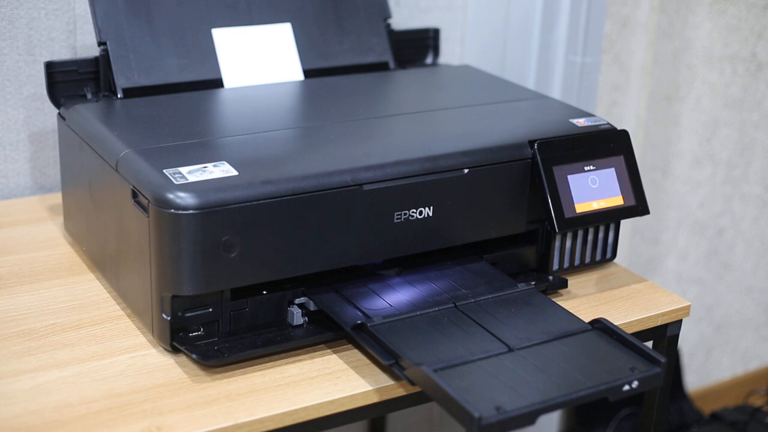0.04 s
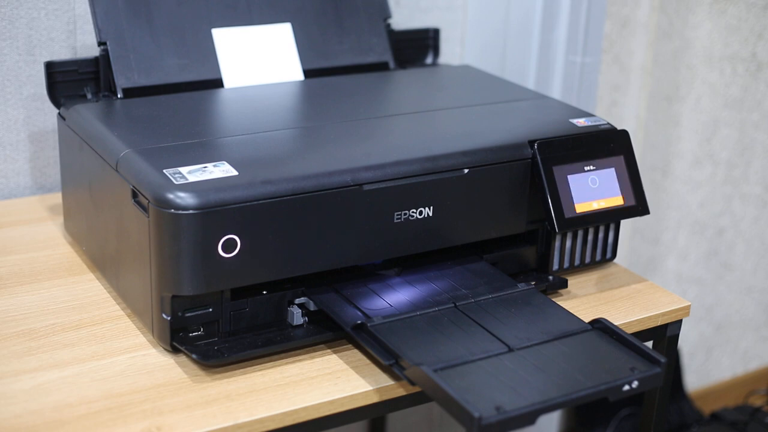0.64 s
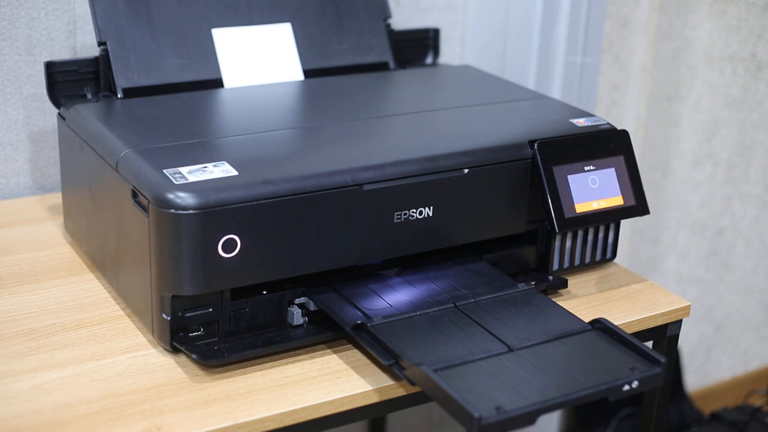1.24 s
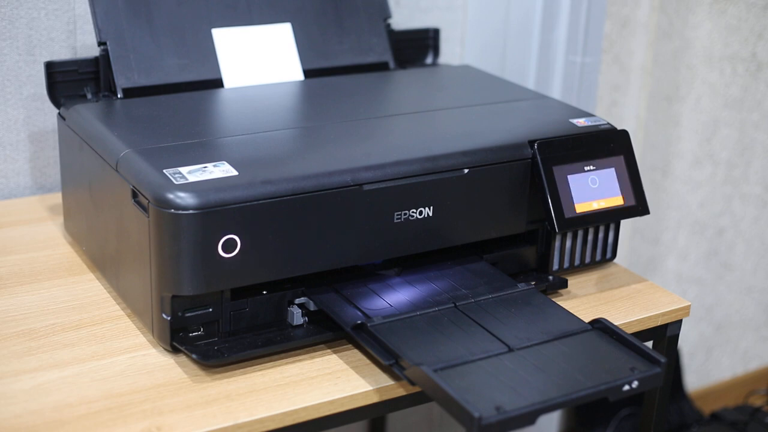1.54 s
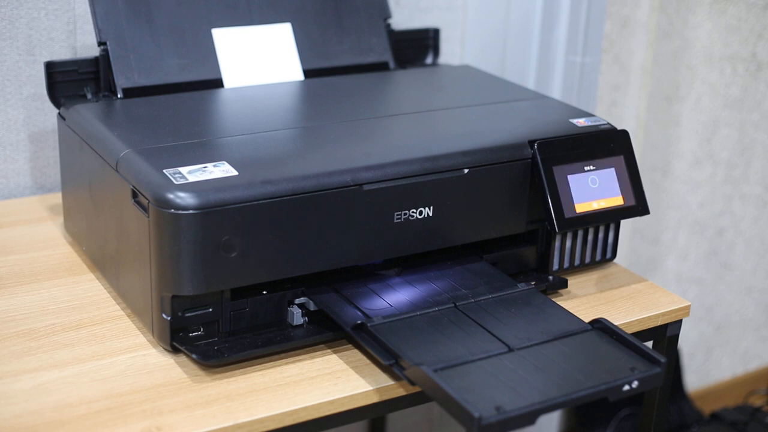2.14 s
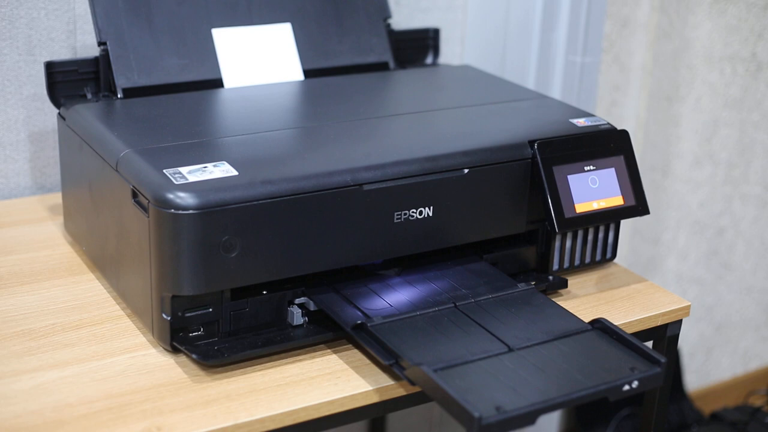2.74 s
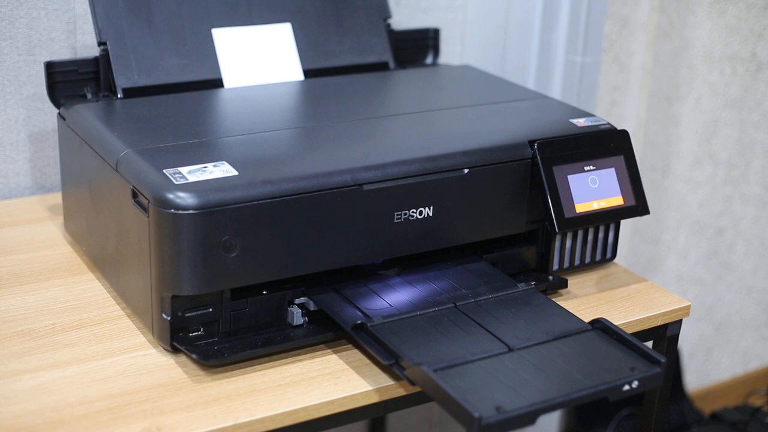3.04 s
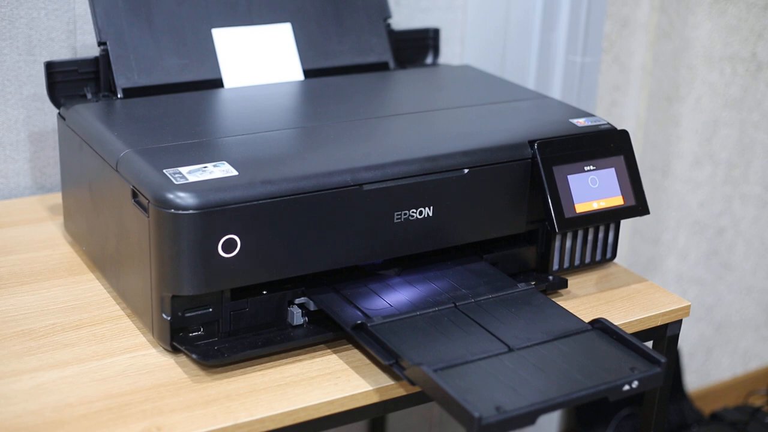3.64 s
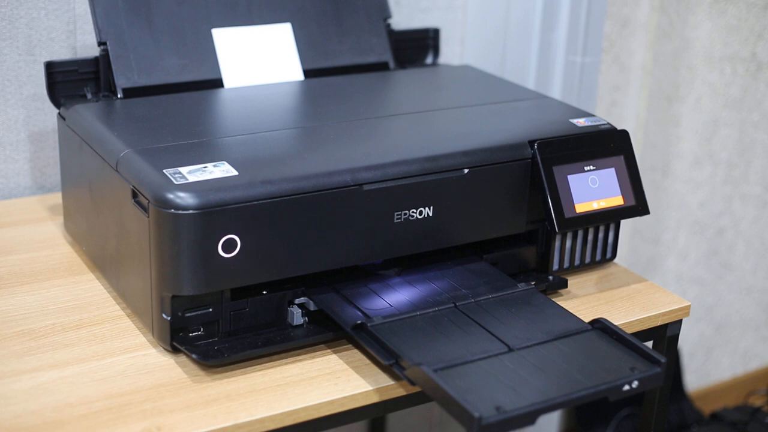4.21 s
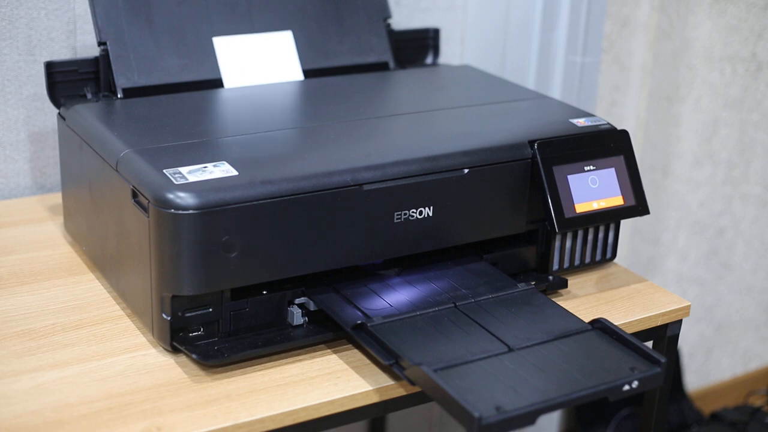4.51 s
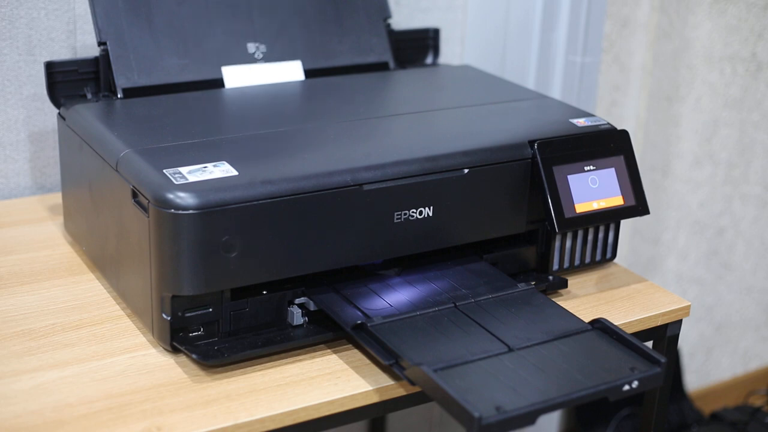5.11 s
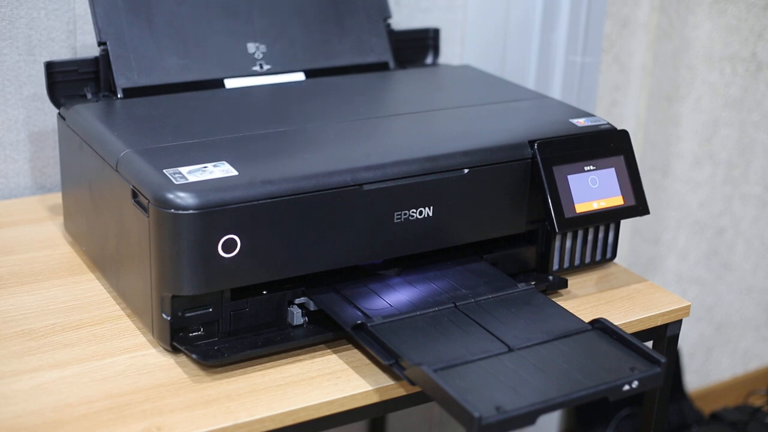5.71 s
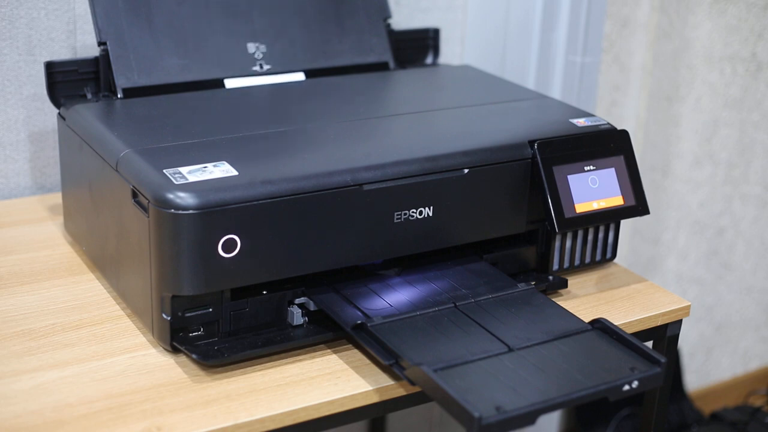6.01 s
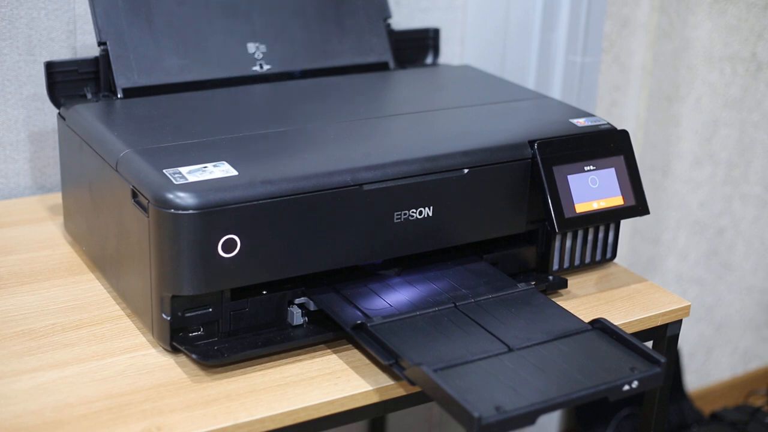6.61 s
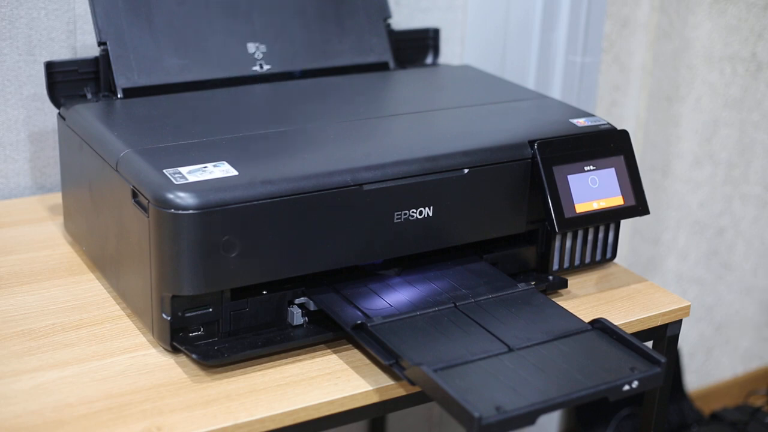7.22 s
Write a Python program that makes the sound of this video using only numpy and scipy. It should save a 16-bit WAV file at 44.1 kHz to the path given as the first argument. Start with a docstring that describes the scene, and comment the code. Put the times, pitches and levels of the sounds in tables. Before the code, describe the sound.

Plastic clicks and carriage knocks from an inkjet printer lead into whirring rollers feeding a sheet, ending with a loud clack.

```python
"""An inkjet printer on a wooden desk in a small room takes in a sheet of paper.
First, plastic levers click and the carriage (the sliding print head) knocks against its stops.
From 3.8 s, geared rollers draw the sheet in with a rattling whir, and a rubber roller chirps on it.
Near 6.8 s a cam (a turning plastic lobe) scrapes to its stop, the feed slams home with a heavy clack,
and the motor runs on briefly. Thin coil whines come and go; a throbbing hum lies under it all."""
import sys
import numpy as np
from scipy import signal
from scipy.fft import rfft, irfft, next_fast_len
from scipy.io import wavfile

SR = 44100
rng = np.random.default_rng(int(sys.argv[2]) if len(sys.argv) > 2 else 0)


def file_out(sig):
    """Save sig as 16-bit WAV at sys.argv[1]."""
    # one column per channel
    cols = np.atleast_2d(sig).T
    # limit, then scale
    lim = np.clip(cols, -1, 1)
    pcm = np.round(lim * 32767).astype(np.int16)
    wavfile.write(sys.argv[1], SR, pcm)


N = 324576
TIME = np.arange(N) / SR
AGE = np.arange(SR // 2) / SR  # seconds since a blow

# tone colour of a struck plastic lever: f/Hz, level/dB
LEVER_SPECTRUM = [(180, -49), (300, -8), (801, -5), (1510, -9.5), (1780, -6), (2360, -0.5), (4230, -2.5),
                  (4830, -4), (5160, -5), (5700, -1), (7570, -5), (9390, -2), (10400, -46), (12700, -17),
                  (16000, -37)]
# pitches at which the plastic panels ring: f/Hz, width/Hz, level/dB
PANEL_RESONANCES = [(615, 16, -6.5), (768.5, 49, 4), (941, 13, 0.5), (1229, 54, 4), (1527, 38, 3),
                    (2274, 84, -1), (2900, 6.7, -2), (3405, 18, 1), (4370, 24, 0), (4500, 47, -22),
                    (6250, 280, -28), (6500, 99, 2.5), (7300, 62, -4.5)]
# the carriage shifts, trips a lever and brakes: t/s, click/dB, brightness/dB, shudder/dB, knock/dB
CARRIAGE_SHIFTS = [(0.1093, -29, -1, -40.5, -37), (0.4827, -32, -0.5, -42.5, -44.5),
                   (0.8706, -26.5, 1.5, -42, -52), (2.2283, -31.5, 1, -40, -40),
                   (2.596, -31, -0.5, -43, -46), (3.0107, -28, 2, -43.5, -55)]
BRAKE_DELAY_S = 0.065  # from the click of a shift to its braking knock


def from_db(db):
    """Turns decibels into a gain, the number a sound is multiplied by."""
    return 10 ** (np.asarray(db) / 20)


def rms_one(x):
    """Scales a sound to an average strength (rms) of 1."""
    return x / np.sqrt(np.mean(x ** 2) + 1e-20)


def unit_blow(x):
    """Scales a blow to rms 1 over its first 10 ms."""
    return x / np.sqrt(np.mean(x[:SR // 100] ** 2) + 1e-20)


def coloured(x, spectrum):
    """Gives a sound a tone colour (f/Hz, level/dB) that falls steeply outside its ends; rms 1."""
    size = next_fast_len(len(x))
    hz = np.fft.rfftfreq(size, 1 / SR) + 1e-3
    points_hz, points_db = np.transpose(spectrum)
    db = np.interp(np.log(hz), np.log(points_hz), points_db)
    edges = 1 / np.sqrt(1 + (points_hz[0] / hz) ** 12 + (hz / points_hz[-1]) ** 12)
    return rms_one(irfft(rfft(x, size) * from_db(db) * edges, size)[:len(x)])


def drift(rate_hz):
    """A slow random wobble with a typical size of 1."""
    step, warm_up = 40, 2000
    r = np.exp(-2 * np.pi * rate_hz * step / SR)
    noise = rng.standard_normal(N // step + warm_up + 2)
    slow = signal.lfilter([1], [1, -2 * r, r * r], noise)[warm_up:]
    return np.interp(np.arange(N) / step, np.arange(len(slow)), rms_one(slow))


def grains(per_s, spread_db):
    """Tiny contacts at random times; a spread other than 0 makes their strength uneven."""
    sizes = from_db(spread_db * np.minimum(rng.exponential(1, N), 4)) * rng.choice([-1, 1], N)
    return sizes * (rng.random(N) < per_s / SR)


def resonate(x, resonances):
    """Lets a sound shake a part that rings at certain pitches."""
    out = 0
    for k, (hz, width, db) in enumerate(resonances):
        r = np.exp(-np.pi * width / SR)
        feedback = [1, -2 * r * np.cos(2 * np.pi * hz / SR), r * r]
        ring = (1 - r * r) / 2 * signal.lfilter([1, 0, -1], feedback, x + 1e-18)
        out = out + (-1) ** k * from_db(db) * ring
    return out


def dense_ring(spectrum, t60, tail_db, rise_s, band_hz=(130, 16000), crack_db=-29):
    """Struck plastic: a crack, a noisy ring that falls 60 dB in t60 seconds, and a tail in the room."""
    crack_t60, room_t60 = 0.0067, 0.21
    band = signal.butter(2, band_hz, "band", fs=SR, output="sos")
    noise = coloured(rng.standard_normal(len(AGE)), spectrum)
    crack = from_db(crack_db - 60 * AGE / crack_t60)
    tail = from_db(tail_db - 60 * AGE / room_t60)
    decay = crack + from_db(-60 * AGE / t60) + tail
    return unit_blow(signal.sosfilt(band, noise * decay * (1 - np.exp(-AGE / rise_s))))


def mode_ring(modes):
    """The fading pure tones (modes) of a struck part; every blow mixes them a little differently."""
    ring = 0
    for k, (hz, db, t60) in enumerate(modes):
        decay = from_db(db + rng.standard_normal() - 60 * AGE / t60)
        ring = ring + (-1) ** k * decay * np.sin(2 * np.pi * hz * AGE)
    bass_cut = signal.butter(6, 122, "high", fs=SR, output="sos")  # a small machine has no deep bass
    return unit_blow(signal.sosfilt(bass_cut, ring * (1 - np.exp(-AGE / 0.0011))))


def add(out, s, sound):
    """Mixes a sound in from time s."""
    at = max(0, round(s * SR))
    out[at:at + len(sound)] += sound[:max(0, N - at)]


def gate(start, end, ramp_s):
    """On between two times, with sloping edges."""
    return np.clip(np.minimum(TIME - start, end - TIME) / ramp_s, 0, 1)


def swell(start, end, attack_s, t60):
    """Rises from the start, holds until the end, then dies away."""
    return np.clip((TIME - start) / attack_s, 0, 1) * from_db(-60 * np.clip((TIME - end) / t60, 0, 3))


def together(gains):
    """Gain of unrelated movements that sound at once: their powers add up."""
    return np.sqrt(sum(gain ** 2 for gain in gains))


def paper_feed():
    """Gear teeth rattle the panels and shake the chassis; paper and guides slide with a grainy hiss."""
    # pitches at which the chassis rings on the desk: f/Hz, width/Hz, level/dB
    chassis_resonances = [(141.4, 21.2, 0.5), (152.4, 23.5, -0.5), (193, 13, -10.5), (216.6, 8.2, -11.5),
                          (280.8, 6.8, -3.5)]
    # tone colour of the gear teeth: f/Hz, level/dB
    gear_spectrum = [(250, 0), (420, -6.5), (484, -3), (584, -8.5), (828, -2.5), (910, -9.5), (1130, -7),
                     (1370, -13.5), (1660, -19), (1810, -29), (2130, -23), (2290, -33.5), (2620, -17),
                     (3780, -61), (4000, -57), (5200, -73), (8800, -120)]
    # tone colour of sliding paper and guides: f/Hz, level/dB
    sliding_spectrum = [(1060, -0.5), (1800, 1.5), (2840, -2.5), (3990, -4), (4790, -5.5), (5700, -8),
                        (7560, -10), (10300, -18.5), (14100, -24), (16000, -19)]
    shaking = coloured(rng.standard_normal(N), [(120, 0), (310, 0)])
    rumble = from_db(-4) * rms_one(resonate(shaking, chassis_resonances))
    teeth = coloured(grains(per_s=1300, spread_db=0) * from_db(2 * drift(2.6)), gear_spectrum)
    rattle = from_db(-1) * teeth + from_db(-7) * rms_one(resonate(teeth, PANEL_RESONANCES))
    flicker = from_db(-4.5 + 1.8 * drift(32))
    hiss = flicker * coloured(grains(per_s=4000, spread_db=-1.5), sliding_spectrum)

    turn_rumble, turn_rattle, turn_hiss = turn_gains()
    shudder, idle = shudder_gain(), from_db(-56)
    rumble *= together([pull_gain(-43.5, follows=0.24, growth_db_per_s=4.7), turn_rumble, shudder, idle])
    rattle *= together([pull_rattle_gain(), turn_rattle, from_db(-11) * shudder])
    cam_hiss = press_gain(-35.5, growth_db_per_s=166)
    hiss *= together([pull_gain(-49.5, follows=0.26, growth_db_per_s=3.6), turn_hiss, cam_hiss])
    return rumble + rattle + hiss


def pull_gain(db, follows, growth_db_per_s):
    """Follows a share of the rollers' changing effort, and grows or fades as the sheet goes in."""
    # effort of drawing the sheet in: t/s, level/dB
    effort = [(3.81, -70.5), (3.818, -50), (3.858, -39), (3.884, -38.5), (3.976, -28.5), (3.988, -37.5),
              (4.238, -47), (4.338, -41), (4.39, -44.5), (4.426, -40), (4.508, -39), (4.54, -37),
              (4.556, -40.5), (4.842, -43.5), (4.906, -36), (4.942, -38.5), (4.95, -34), (5.196, -35.5),
              (5.27, -42), (5.33, -31), (5.38, -49.5)]
    s, effort_db = np.transpose(effort)
    swing_db = np.interp(TIME, s, effort_db - effort_db.mean())
    growth_db = growth_db_per_s * (np.clip(TIME, s[0], s[-1]) - s.mean())
    return swell(s[0], s[-1], attack_s=0.015, t60=0.29) * from_db(db + follows * swing_db + growth_db)


def pull_rattle_gain():
    """How hard the gears rattle while they pull the sheet."""
    return pull_gain(-43, follows=0.93, growth_db_per_s=1.2)


def turn_gains():
    """Gains of rumble, rattle and hiss: each light turn of the rollers starts, fades or grows, and stops."""
    # turns of the rollers: start/s, end/s, rumble/dB, rattle/dB, hiss/dB, fade/(dB per s)
    turns = [(1.875, 2.173, -51, -74, -77, 17), (3.462, 3.817, -46, -50, -51.5, 5.5),
             (5.735, 6.06, -44.5, -54, -52, -7), (6.162, 6.49, -44, -43.5, -46.5, 27),
             (6.524, 6.8, -56.5, -56.5, -56, -38), (6.86, 7.173, -47, -45, -41, 5),
             (7.238, 7.36, -50, -64, -65, 1.5)]
    gains = 0
    for start, end, *levels_db, fade_db_per_s in turns:
        fade = from_db(-fade_db_per_s * (np.clip(TIME, start, end) - start))
        gains = gains + np.outer(from_db(levels_db), fade * swell(start, end, attack_s=0.022, t60=0.16))
    return gains


def shudder_gain():
    """The chassis shudders at every lurch of a motor, and as the carriage starts and brakes."""
    # a motor takes up or drops its load: t/s, level/dB
    lurches = [(0.05, -43.5), (0.35, -52), (0.77, -49), (2.46, -47), (2.935, -39.5), (3.22, -45),
               (3.41, -41), (3.91, -49), (4.085, -43), (4.335, -39), (4.47, -30), (5.02, -35), (5.29, -39),
               (5.44, -39.5), (6.16, -36), (6.78, -44), (6.875, -35.5)]
    starts = [(s - 0.003, db + 0.5) for s, _, _, db, _ in CARRIAGE_SHIFTS]
    brakes = [(s + BRAKE_DELAY_S, db + 1.5) for s, _, _, db, _ in CARRIAGE_SHIFTS]
    return together(from_db(db) * swell(s - 0.049, s + 0.029, attack_s=0.049, t60=0.35)
                    for s, db in starts + brakes + lurches)


def slam():
    """The feed slams home with a hard crack, after which the frame rings."""
    # the feed slams home, then bounces twice more weakly: t/s, level/dB
    hits = [(6.7778, -11), (6.7797, -21.5), (6.7943, -27)]
    # tone colour of the struck frame: f/Hz, level/dB
    frame_spectrum = [(130, -16), (280, 5), (380, 5), (560, -25), (900, -5), (1100, 10.5), (1450, -3),
                      (2200, -6), (3100, -3), (4000, -12), (5200, -8), (7000, -24), (15000, -35)]
    # ringing tones of the frame: f/Hz, level/dB, t60/s
    frame_modes = [(368, 7.5, 0.097), (428, -12, 0.21), (705, -3, 0.15), (1060, -17, 0.039),
                   (1150, 11, 0.02), (1390, -18, .07), (1590, -1.5, 0.054), (1830, -11, 0.1),
                   (2540, -5, 0.059), (2910, -12, 0.11), (3630, -22, .07), (4900, -17, .06)]
    out = np.zeros(N)
    for s, db in hits:
        crack = dense_ring(frame_spectrum, t60=0.039, tail_db=-26, rise_s=0.000091, band_hz=(270, 16000))
        add(out, s, from_db(db - 5.5) * crack + from_db(db - 6) * mode_ring(frame_modes))
    return out


def levers():
    """Each click has a hollow body, a clack and a snap, and rings the panels; higher parts die sooner."""
    # clicks of plastic levers and catches: t/s, level/dB, brightness/dB
    clicks = [(0.4615, -33, 0), (0.7544, -50, -11), (0.8074, -35, -2), (0.852, -25.5, 1.5),
              (0.8876, -29.5, -1), (1.8538, -53, -8), (2.0781, -27.5, -0.5), (2.2083, -41.5, 1),
              (2.802, -47, -7.5), (2.8562, -34, -1), (2.8973, -30.5, -1), (2.9353, -41.5, -5.5),
              (3.0012, -38, -10), (3.3577, -35, -1), (3.3672, -23, 3), (3.3754, -25.5, 1),
              (3.4094, -36, -4), (3.46, -41.5, -4.5), (3.548, -42.5, -8), (3.9429, -39, -7),
              (4.2945, -40, -4.5), (4.3174, -36.5, -5.5), (4.4168, -28.5, -1.5), (4.4474, -33, -2),
              (4.4706, -34, 17.5), (4.5262, -30.5, -3), (4.5384, -36, -1), (4.948, -39, -6),
              (4.9746, -40, -3), (5, -30.5, -0.5), (5.1464, -41, 8), (5.1939, -36, 0), (5.2782, -34.5, -4),
              (5.3102, -24.5, 2.5), (5.3275, -32, -2), (5.7586, -35.5, -1.5), (5.7731, -34.5, -3),
              (5.7843, -28, 2), (5.793, -25, 4.5), (5.8095, -27.5, 1), (5.8414, -27, 2), (5.8635, -31, -2),
              (5.8807, -25.5, 3), (5.9182, -27.5, 6), (5.9788, -31.5, 1), (6.0087, -42.5, -6),
              (6.0314, -40, -2.5), (6.0666, -49.5, -9), (6.1402, -39, -6), (6.1551, -35.5, 1),
              (6.1744, -41.5, 1), (6.3035, -38.5, -1.5), (6.4743, -46, -1), (6.8457, -38, -3),
              (6.872, -23, 0), (6.8914, -27, 6), (6.9016, -28, 3), (7.1686, -43.5, 1),
              (7.2279, -47.5, -5.5)]
    trips = [(s, db, bright_db) for s, db, bright_db, _, _ in CARRIAGE_SHIFTS]
    touches = [(s - 0.025, db - 11.5, -3.5) for s, db, _ in trips]  # the carriage brushes the lever first
    out = np.zeros(N)
    for s, db, bright_db in trips + touches + clicks:
        add(out, s, from_db(db) * lever_click(bright_db))
    return from_db(-1) * out + from_db(4.5) * resonate(out, PANEL_RESONANCES)


def lever_click(bright_db):
    """One lever strikes; a brighter click has more snap and less body."""
    # tone colour of the snap: f/Hz, level/dB
    snap_spectrum = [(4000, 6), (6200, 1.5), (8100, -2.5), (9500, -4), (12000, -8.5), (16000, -15)]
    body = dense_ring(LEVER_SPECTRUM, t60=0.092, tail_db=-8, rise_s=0.0025,
                      band_hz=(414, 1470), crack_db=21.5)
    clack = dense_ring(LEVER_SPECTRUM, t60=0.075, tail_db=-24, rise_s=0.0029,
                       band_hz=(1520, 5230), crack_db=16)
    snap = dense_ring(snap_spectrum, t60=0.027, tail_db=-27, rise_s=0.004,
                      band_hz=(4960, 17100), crack_db=5)
    return from_db(-7.5 - bright_db) * body + from_db(-10.5) * clack + from_db(bright_db - 15.5) * snap


def carriage():
    """The carriage brakes, or hits a stop and bounces once; the dull knocks shake the whole machine."""
    # the carriage meets a stop: t/s, level/dB, hardness/dB
    knocks = [(0.341, -32.5, 0), (2.459, -34, 4.5), (3.212, -33.5, 0), (3.811, -33, -1.5), (5.313, -37, -1),
              (5.43, -29, -3.5), (6.176, -33, -2)]
    # tone colour of the contact: f/Hz, level/dB
    stop_spectrum = [(130, 7), (300, -11), (480, 9.5), (900, -6), (1600, -7), (2200, -9), (3400, -13),
                     (5000, -27), (12000, -42)]
    # low ringing tones of the machine: f/Hz, level/dB, t60/s
    machine_modes = [(146, -1, 0.11), (229, -15, 0.068), (267.8, -14.5, 0.24), (389, -18, 0.28),
                     (446, -5.5, 0.32), (495, -6, 0.15), (510, -45, 0.042), (768, -8, 0.082),
                     (913, -4.5, 0.07), (1190, -3, 0.049)]
    bounces = [(s + 0.008, db - 6, hard_db) for s, db, hard_db in knocks]
    brakes = [(s + BRAKE_DELAY_S, db, 1) for s, _, _, _, db in CARRIAGE_SHIFTS]
    out = np.zeros(N)
    for s, db, hard_db in knocks + bounces + brakes:
        contact = from_db(hard_db - 7) * dense_ring(stop_spectrum, t60=0.085, tail_db=-27, rise_s=0.00046)
        add(out, s, from_db(db) * (contact + from_db(-7.5) * mode_ring(machine_modes)))
    return out


def cam():
    """A cam scrapes up to its stop: plastic slips on plastic in quick small steps, harder and harder."""
    # pitches at which the cam rings: f/Hz, width/Hz, level/dB
    cam_resonances = [(434, 16, 2), (660, 39, 2), (1053, 82, 0), (1250, 77, -5), (1500, 140, -8),
                      (1700, 120, -9), (1940, 79, -6), (2390, 48, -8), (2970, 330, -16)]
    slips = coloured(grains(per_s=2900, spread_db=3.5), [(350, 0), (3500, 0)])
    return press_gain(-28, growth_db_per_s=84) * rms_one(resonate(slips, cam_resonances))


def press_gain(db, growth_db_per_s):
    """Grows until the cam reaches its stop, then dies away."""
    start_s, end_s = 6.686, 6.785
    remaining_s = end_s - np.clip(TIME, start_s, end_s)
    return from_db(db - growth_db_per_s * remaining_s) * swell(start_s, end_s, attack_s=0.021, t60=0.26)


def casing_growl():
    """The working gears and the pressing cam strain the casing, which answers with a low growl."""
    # pitches at which the casing rings: f/Hz, width/Hz, level/dB
    casing_resonances = [(314.6, 87, -3.5), (332, 13.4, 4), (382.3, 11.7, 1), (445, 8, -0.5), (507, 25, -3)]
    _, turn_rattle, _ = turn_gains()
    pull = pull_gain(-40.5, follows=0.77, growth_db_per_s=-0.85)
    load = together([pull, from_db(-1) * turn_rattle, press_gain(-23.5, growth_db_per_s=198)])
    jolts = coloured(grains(per_s=2800, spread_db=-2.5), [(290, 0), (540, 0)])
    return from_db(-3.5) * load * rms_one(resonate(jolts, casing_resonances))


def chatter():
    """Loose plastic parts tick at random, as strongly as the gears shake them."""
    _, turn_rattle, _ = turn_gains()
    tick = dense_ring(LEVER_SPECTRUM, t60=0.057, tail_db=-22, rise_s=0.00079,
                      band_hz=(580, 2040), crack_db=-6)
    ticks = signal.fftconvolve(grains(per_s=90, spread_db=1.4), tick)[:N]
    return from_db(-11.5) * together([pull_rattle_gain(), turn_rattle]) * rms_one(ticks)


def roller_chirps():
    """The rubber roller sticks and slips on the sheet twelve times, at a nearly steady rate."""
    # ringing tones of the roller: f/Hz, level/dB, t60/s
    roller_modes = [(2480, -3, 0.02), (2800, -5, 0.02), (2880, 3, 0.02), (3300, -5, 0.022)]
    start_s, period_s, jitter_s = 4.731, 0.027, 0.00156
    out = np.zeros(N)
    for k, (lateness, strength) in enumerate(rng.standard_normal((12, 2))):
        s = start_s + k * period_s + jitter_s * lateness
        add(out, s, from_db(-53 + 5.5 * strength) * mode_ring(roller_modes))
    return out


def spring_pings():
    """A latch spring is let go and rings thinly."""
    # releases of the spring: t/s, level/dB
    releases = [(0.4845, -34.5), (2.5992, -36), (4.471, -47), (6.895, -33)]
    # ringing tones of the spring: f/Hz, level/dB, t60/s
    spring_modes = [(4700, -9, 0.04), (5920, 12, 0.02), (5920, 8, 0.018), (8800, -21, .06)]
    out = np.zeros(N)
    for s, db in releases:
        add(out, s, from_db(db - 7) * mode_ring(spring_modes))
    return out


def motors():
    """Gears sing with a slightly wavering pitch; rapidly switched current makes the motor coils whine."""
    # gears and rollers at steady speed: start/s, end/s, f/Hz, level/dB, fall per harmonic/dB
    runs = [(5.197, 5.344, 200, -40.5, 27), (5.853, 6.1, 783, -53, 20), (6.234, 6.654, 325, -55.5, 6.5),
            (6.253, 6.683, 275, -59.5, 9), (6.92, 7.198, 422, -47.5, 5)]
    # whines of the coils: start/s, end/s, f/Hz, level/dB
    whines = [(0.92, 1.44, 14449, -74), (0.92, 1.44, 10115, -78), (1.45, 1.5, 11536, -68),
              (5.9, 7.34, 13587, -74), (5.9, 6.5, 10869, -81), (7.12, 7.36, 10869, -74)]
    out = np.zeros(N)
    for start, end, hz, db, fall_db in runs:
        phase = 2 * np.pi * np.cumsum(hz * (1 + 0.0042 * drift(10))) / SR
        tone = sum(from_db(db - fall_db * k) * np.sin((k + 1) * phase) for k in range(3))
        out += gate(start, end, ramp_s=0.07) * tone
    for start, end, hz, db in whines:
        out += gate(start, end, ramp_s=0.005) * from_db(db) * np.sin(2 * np.pi * hz * TIME)
    return np.sqrt(2) * out


def background():
    """Hum tones, several about 20 Hz apart, beat into a soft throb over the hiss of the room."""
    # steady tones of the hum: f/Hz, level/dB
    hum_tones = [(119.9, -66.5), (140.0, -66.5), (159.5, -82), (180, -65.5), (195, -84), (251, -66),
                 (287.4, -67), (340.4, -64.5), (360, -68), (380, -69), (574.6, -73.5)]
    # tone colour of the room's hiss: f/Hz, level/dB
    air_spectrum = [(25, -31), (50, -15), (90, -13.5), (140, -5.5), (220, -19), (330, -9), (450, -13.5),
                    (600, -11.5), (1000, -15), (4000, -20.5), (14800, -27), (16000, -31)]
    hum = sum(from_db(db) * np.sin(2 * np.pi * (hz * TIME + rng.random())) for hz, db in hum_tones)
    return np.sqrt(2) * hum + from_db(-57) * coloured(rng.standard_normal(N), air_spectrum)


def scene():
    """The printer heard from close by, in one channel."""
    blows = levers() + carriage() + slam() + roller_chirps() + spring_pings()
    running = cam() + paper_feed() + chatter() + casing_growl() + motors()
    return (blows + running + background())[None]


def record(dry):
    """Rounds off the strongest peaks and cuts the treble steeply above 15900 Hz."""
    rounded = 0.9 * np.tanh(dry / 0.9)
    return signal.sosfilt(signal.ellip(12, 0.1, 80, 15900, fs=SR, output="sos"), rounded)


dry = scene()
out = record(dry)
file_out(out)
```